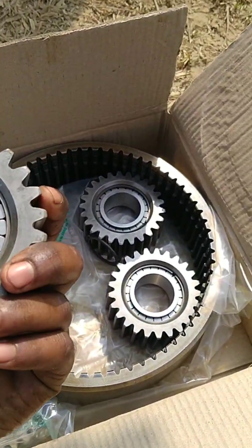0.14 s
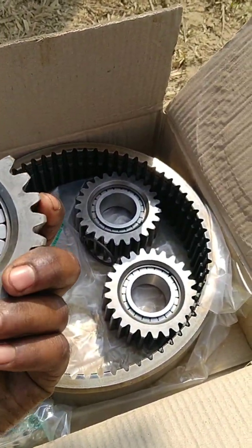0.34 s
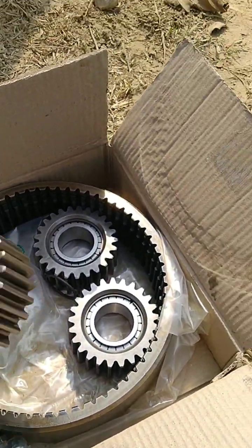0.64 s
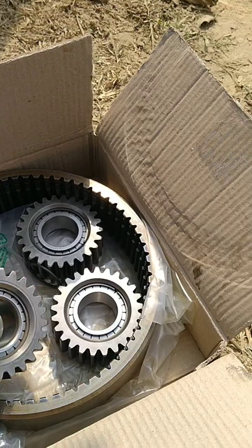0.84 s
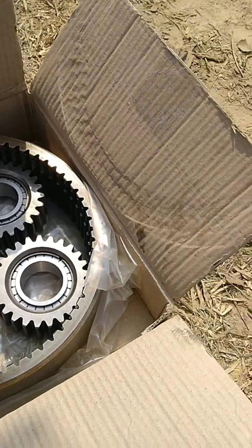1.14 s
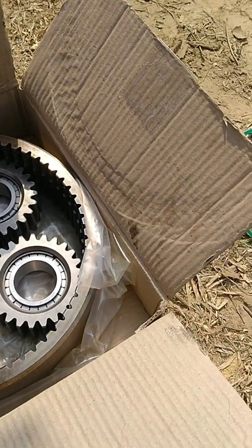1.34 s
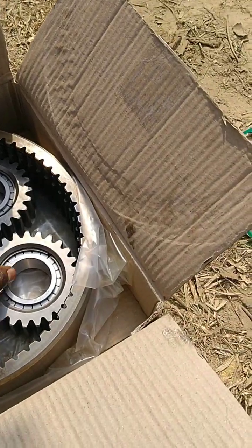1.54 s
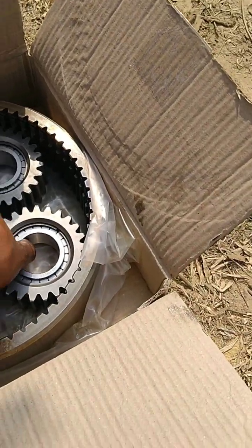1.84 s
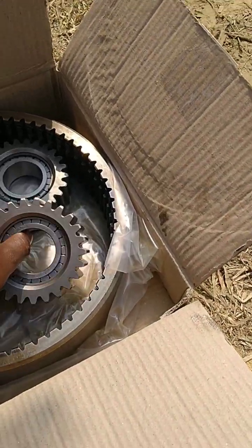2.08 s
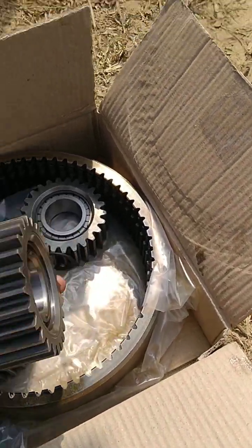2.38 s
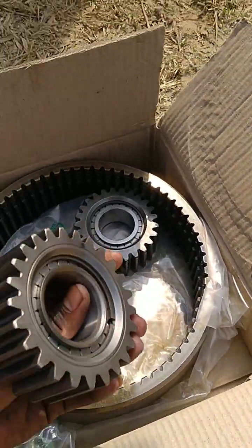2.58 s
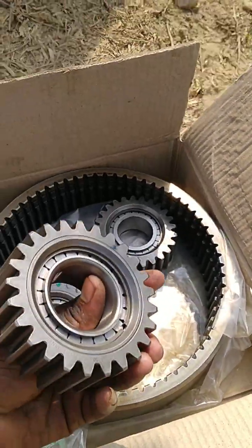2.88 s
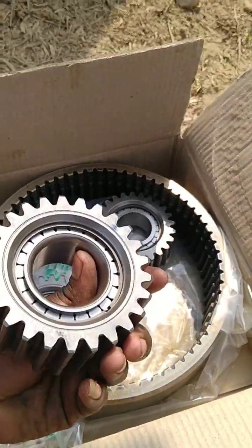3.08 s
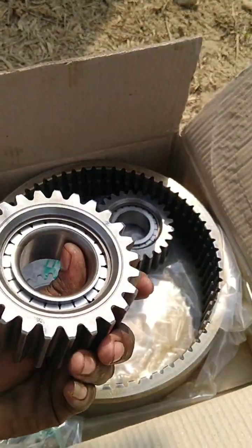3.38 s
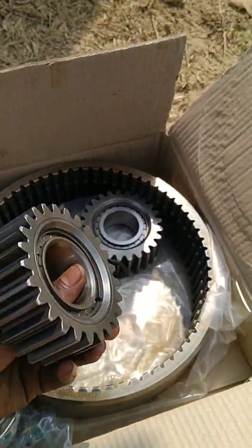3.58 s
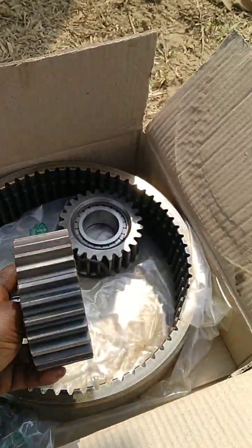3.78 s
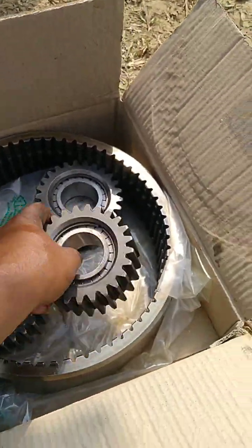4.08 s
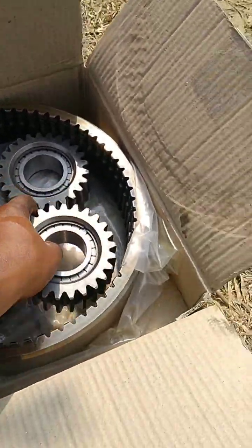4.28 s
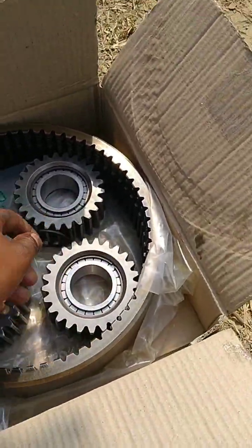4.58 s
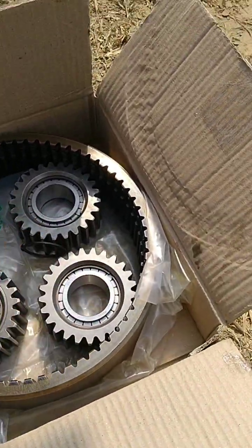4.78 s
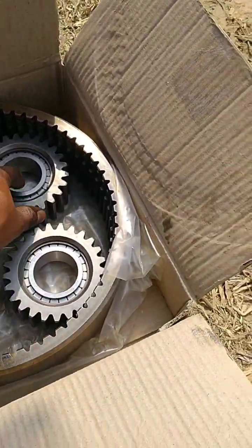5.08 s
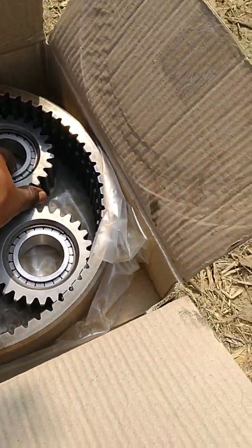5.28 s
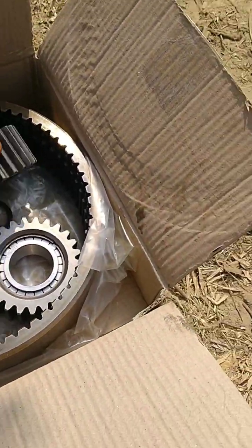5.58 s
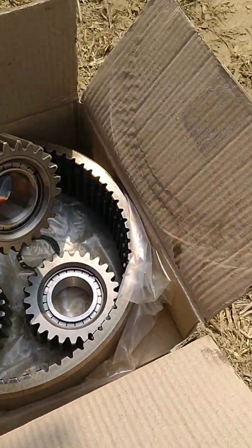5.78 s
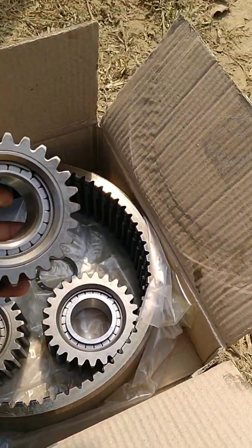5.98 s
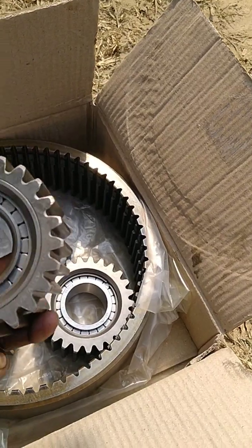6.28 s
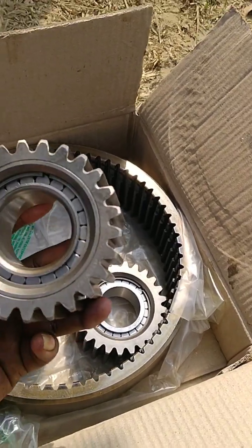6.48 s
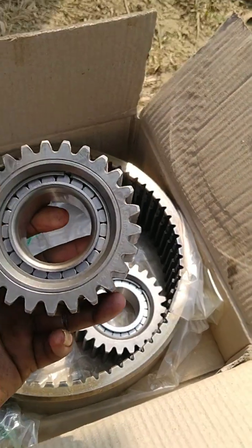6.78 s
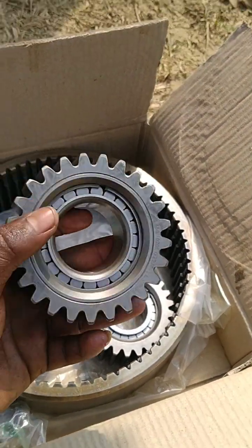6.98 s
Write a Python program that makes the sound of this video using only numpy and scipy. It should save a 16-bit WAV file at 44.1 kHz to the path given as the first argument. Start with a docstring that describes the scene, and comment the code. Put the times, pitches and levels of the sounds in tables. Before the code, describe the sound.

Heavy steel gears clank, scrape and ring briefly as they are handled outdoors, with crackling plastic and rubbing cardboard.

```python
"""Outdoors, in a plastic-lined carton: heavy steel planet gears are set into a ring gear and lifted out.
They knock, ping and ring briefly; their teeth catch, scrape and squeal as they slide out of mesh.
Each move of the hand crackles the plastic sheet and rubs the cardboard.
There are faint gliding squeaks, as of fingers on steel, and a late thin whistle.
Behind it all are light wind and the drone of a far engine."""
import sys
import numpy as np
from scipy import signal
from scipy.fft import rfft, irfft
from scipy.io import wavfile

SR = 44100
rng = np.random.default_rng(int(sys.argv[2]) if len(sys.argv) > 2 else 0)


def bounce(signal):
    """Save signal as a 16-bit WAV file at the path given by the first command-line argument."""
    frames = np.transpose(np.atleast_2d(signal))
    limited = np.clip(frames, -1, 1)
    pcm = np.round(limited * 32767).astype(np.int16)
    wavfile.write(sys.argv[1], SR, pcm)


N = 314874
T = np.arange(N) / SR
RING_T = np.arange(SR) / SR


def amp(db):
    """Decibels to gain."""
    return 10 ** (np.asarray(db) / 20)


def unit(x):
    """Scales to rms 1."""
    return x / np.sqrt(np.mean(x ** 2) + 1e-20)


def add(mix, start_s, sound):
    """Mixes a sound in at start_s."""
    part = mix[max(round(start_s * SR), 0):][:len(sound)]
    part += sound[:len(part)]


def level(rows, column):
    """Gain over time from one dB column of a curve, silent outside it."""
    rows = np.array(rows)
    return amp(np.interp(T, rows[:, 0], rows[:, column], left=-np.inf, right=-np.inf))


def swells(rows):
    """Gain of smooth rises and falls."""
    out = np.zeros(N)
    for start_s, length_s, level_db in rows:
        add(out, start_s, amp(level_db) * np.hanning(round(length_s * SR)))
    return out


def colour(x, spectrum, size=2048):
    """Minimum-phase filter with the given spectrum and power gain 1."""
    hz, db = np.transpose(spectrum)
    log_hz = np.log(abs(np.fft.fftfreq(size, 1 / SR)) + 1)
    log_gain = np.log(amp(np.interp(log_hz, np.log(hz), db)))
    impulse = np.fft.ifft(np.exp(np.conj(signal.hilbert(log_gain)))).real[:size // 2]
    return signal.oaconvolve(x, impulse / np.linalg.norm(impulse))[:len(x)]


def noise(spectrum):
    """Steady noise with the given spectrum, rms 1."""
    hz, db = np.transpose(spectrum)
    gain = amp(np.interp(np.log(np.fft.rfftfreq(N, 1 / SR) + 1), np.log(hz), db))
    return unit(irfft(rfft(rng.standard_normal(N)) * gain, N))


def drift(per_s):
    """Random wander, rms 1."""
    knots_s = np.arange(0, T[-1] + 1, 1 / per_s)
    return unit(np.interp(T, knots_s, rng.standard_normal(len(knots_s))))


def grains(per_s, spread_db):
    """Random impulses of uneven size, rms 1."""
    size = amp(spread_db * np.minimum(rng.exponential(1, N), 4))
    return unit(size * rng.choice([-1, 1], N) * (rng.random(N) < per_s / SR))


def fade(t, t60_s):
    """Exponential decay."""
    return np.exp(-np.log(1000) * t / t60_s)


def burst(t60_s, tail_db, tail_t60_s):
    """A puff of noise and its weak scatter inside the carton."""
    t = RING_T[:SR // 4]
    return rng.standard_normal(len(t)) * (fade(t, t60_s) + amp(tail_db) * fade(t, tail_t60_s))


# outdoor ambience: freq_hz, gain_db
AIR_SPECTRUM = [(12, -45.5), (20, -10.5), (49, -4.5), (74, -11.5), (187, -16.5), (222, -27.5), (293, -10.5),
                (319, -25), (434, -28), (897, -35), (1060, -33.5), (2200, -32.5), (2670, -27.5),
                (5080, -56.5), (16000, -49)]


def air(start_db=-64, fade_db_per_s=0.33):
    """Still air: a low hush, slowly fading."""
    return amp(start_db - fade_db_per_s * T) * noise(AIR_SPECTRUM)


# engine speed: time_s, firing_hz
ENGINE_SPEED = [(0, 48.15), (1.1, 51.64), (2.1, 54.5), (2.5, 59.06), (2.85, 55.5), (3.45, 43.24),
                (4.5, 50.4), (5.5, 49.83), (7.14, 48.3)]
# engine harmonics: order, gain_db
ENGINE_ORDERS = [(1, -1), (2, -0.5), (3, -14), (4, -9)]


def engine(level_db=-63.5, idle_hz=49.7, rev_db_per_hz=0.58, loudest_s=2.5, swell_s=2.1):
    """A far engine: wavering multiples of its firing rate, louder as it revs."""
    firing_hz = np.interp(T, *np.transpose(ENGINE_SPEED))
    phase = 2 * np.pi * np.cumsum(firing_hz * (1 + 0.0083 * drift(per_s=27))) / SR
    gain = amp(level_db + rev_db_per_hz * (firing_hz - idle_hz)) / np.hypot(1, (T - loudest_s) / swell_s)
    return gain * sum(amp(db + 2 * drift(per_s=40)) * np.sin(k * phase) for k, db in ENGINE_ORDERS)


# hand moves: peak_s, rise_s, fall_s, sheet_db, cardboard_db
HAND_MOVES = [(.03, 0.11, 0.08, -74.5, -69), (.66, 0.079, 0.1, -56.5, -74), (1.08, 0.4, 0.28, -67, -67.5),
              (1.3, 0.059, 0.068, -44, -56), (1.8, 0.17, 0.063, -59, -63), (2.07, 0.18, 0.11, -55, -57.5),
              (2.48, .22, 0.18, -55, -55.5), (2.7, 0.037, 0.028, -55, -60), (3.56, .15, 0.15, -75.5, -74),
              (3.99, 0.099, 0.11, -59.5, -69.5), (4.3, 0.14, 0.32, -66.5, -66),
              (4.59, 0.046, 0.094, -48.5, -48.5), (5.06, 0.11, 0.13, -59.5, -61),
              (5.59, 0.099, 0.08, -46, -53), (5.96, 0.12, 0.15, -57.5, -65)]
REST_SHEET_DB, REST_CARDBOARD_DB = -82, -77


def handling(rest_db, column, shape=0.95):
    """Gain of overlapping hand moves: pointed peaks over a hand that never quite stops."""
    power = amp(rest_db) ** 2
    for move in HAND_MOVES:
        peak_s, rise_s, fall_s = move[:3]
        away = np.maximum((peak_s - T) / rise_s, (T - peak_s) / fall_s)
        power = power + amp(move[column]) ** 2 * np.exp(-2 * away ** shape)
    return np.sqrt(power)


# wind rumble: freq_hz, gain_db
WIND_SPECTRUM = [(15, -1), (30, -0.5), (55, -1.5), (90, -8), (180, -24), (400, -47)]
# puffs of air: start_s, length_s, level_db
GUSTS = [(1.88, 0.18, -48.5), (2.6, 0.33, -57), (3.76, 0.31, -59), (4.14, 0.27, -48.5), (5.1, 0.37, -57),
         (5.7, 0.28, -52.5)]


def wind(breeze_db=-66, swing_db=2, stir_db_per_db=0.5, trim_db=-3.5):
    """Light wind and puffs on the microphone; handling stirs the breeze."""
    stir = (handling(REST_CARDBOARD_DB, column=4) / amp(REST_CARDBOARD_DB)) ** stir_db_per_db
    breeze = stir * amp(breeze_db + swing_db * drift(per_s=8))
    return amp(trim_db) * noise(WIND_SPECTRUM) * (breeze + swells(GUSTS))


# two squeaks, then a whistle, one curve each: time_s, pitch_hz, level_db
GLIDES = [
    [(2.76, 5500, -64), (2.79, 6170, -51.5), (2.83, 6140, -55), (2.87, 6600, -64)],
    [(2.97, 5800, -67.5), (3.01, 5520, -69), (3.07, 4265, -70)],
    [(6.58, 6600, -85), (6.64, 7250, -76), (6.75, 7510, -77.5), (6.81, 6950, -80.5), (6.9, 7980, -80.5),
     (6.94, 7400, -76), (7, 6850, -86)],
]


def squeaks_and_whistle(tone_db=-12, fuzz_db=-13):
    """Faint, thin gliding squeaks, as of fingers on steel, and a late thin whistle."""
    out = np.zeros(N)
    for curve in GLIDES:
        time_s, pitch_hz, _ = np.transpose(curve)
        phase = 2 * np.pi * np.cumsum(np.interp(T, time_s, pitch_hz)) / SR
        fuzz = drift(per_s=890) * np.sin(phase) + drift(per_s=350) * np.cos(phase)
        out += level(curve, column=2) * (amp(tone_db) * np.sin(phase) + amp(fuzz_db) * fuzz)
    return out


# cardboard friction: freq_hz, gain_db
RUB_SPECTRUM = [(88, -34), (150, -2), (226, -5), (457, -2), (605, -13), (811, -6), (953, -10), (1090, -4.5),
                (1480, -10), (1980, -10.5), (5000, -23.5), (6500, -51), (11000, -120)]
# carton flexing: start_s, length_s, level_db
THUDS = [(1.93, 0.105, -52), (4.17, 0.17, -49)]
# flex thud: freq_hz, gain_db
THUD_SPECTRUM = [(25, 22), (65, 30.5), (150, 29), (260, 15), (900, -51)]


def carton():
    """Cardboard rubs with each move and flexes under the load."""
    rub_gain = handling(REST_CARDBOARD_DB, column=4) * amp(1.5 + 0.91 * drift(per_s=40))
    return noise(RUB_SPECTRUM) * rub_gain + noise(THUD_SPECTRUM) * swells(THUDS)


# loud crease snaps: start_s, level_db, body_db
SNAPS = [(0.529, -37, -9.5), (1.1272, -36, -1), (1.2536, -19.5, 10.5), (1.297, -12.5, 5), (1.306, -14, 8.5),
         (1.3786, -25, -12), (1.551, -36, -8), (1.6813, -24, -4), (1.7473, -24.5, -0.5), (1.95, -29.5, -1),
         (2.028, -24, -1), (2.0825, -14.5, -15), (2.7135, -30, 0), (2.7356, -36, 2), (3.331, -35.5, -12.5),
         (3.3512, -35.5, 2), (3.394, -40.5, -0.5), (3.4282, -41, -1), (3.5085, -44.5, -1), (3.714, -42, -4),
         (4.556, -32, 14), (4.5772, -13.5, 2), (4.592, -34, 9), (4.7535, -31, -5.5), (4.963, -38.5, -1),
         (5.4034, -36, 12), (5.4794, -27.5, 7), (5.568, -21, 4), (5.5839, -23, 6)]
# one snap: freq_hz, gain_db
SNAP_SPECTRUM = [(300, -11.5), (1000, 2), (2300, 2), (4000, -5.5), (7000, -2), (10000, -4.5), (14000, 3.5),
                 (16000, 1.5)]
# sheet crushed by a gear: start_s, length_s, level_db
CRUSHES = [(1.262, 0.083, -38), (1.672, 0.019, -38.5), (1.702, 0.021, -43.5), (4.558, 0.05, -34.5)]
# sheet rustle: freq_hz, gain_db
RUSTLE_SPECTRUM = [(180, -29.5), (300, -5), (455, -1), (614, -14.5), (1060, -9.5), (1640, -16.5),
                   (2000, -3.5), (3400, -13), (7820, -10.5), (9240, -18.5), (15000, -3.5), (16000, -10.5)]


def plastic(treble_hz=13000, snap_trim_db=-5, crinkles_per_s=20, crinkle_db=-8):
    """Creases snap one by one, crunch under a gear, and hiss and crinkle as the sheet shifts."""
    out = np.zeros(N)
    for start_s, level_db, body_db in SNAPS:
        spectrum = [(hz, db + body_db * np.clip(np.log2(treble_hz / hz), 0, 1))
                    for hz, db in SNAP_SPECTRUM]
        snap = colour(burst(t60_s=0.0091, tail_db=-22, tail_t60_s=0.049), spectrum)
        add(out, start_s + 0.001, amp(level_db + snap_trim_db) * snap)
    crunch = colour(grains(per_s=4600, spread_db=6.5), RUSTLE_SPECTRUM)
    grit = colour(grains(per_s=2300, spread_db=3.5), RUSTLE_SPECTRUM)
    hiss = unit(noise(RUSTLE_SPECTRUM) + 1.4 * grit) * amp(2 + 0.43 * drift(per_s=70))
    crease = burst(t60_s=0.006, tail_db=-23.5, tail_t60_s=0.05)
    creases = signal.oaconvolve(grains(crinkles_per_s, spread_db=2.5), crease)[:N]
    crinkle = amp(crinkle_db) * unit(colour(creases, SNAP_SPECTRUM))
    return out + crunch * swells(CRUSHES) + (hiss + crinkle) * handling(REST_SHEET_DB, column=3)


def bounces(start_s=2.0806, gap_s=0.013, shrink=0.76, first_db=-20, loss_db=4, hz=1760, t60_s=0.012):
    """Tap rows for a tooth bouncing out of mesh, each bounce sooner and weaker."""
    return [(start_s + gap_s * np.sum(shrink ** np.arange(k)), first_db - k * loss_db, hz, t60_s)
            for k in range(4)]


# teeth catching: start_s, level_db, centre_hz, t60_s
TOOTH_TAPS = [(.617, -45, 4000, .015), (.935, -52.5, 901, .031), (1.087, -51.5, 4000, .018),
              (1.68, -41.5, 1900, .042), (1.71, -42.5, 2330, .04), (1.747, -31, 2100, 0.0067),
              (2.03, -39, 1840, .015), (2.912, -52.5, 1904, .08), (3.19, -61.5, 5000, .071),
              (3.349, -47, 3500, .02), (4.156, -49.5, 870, .047), (4.181, -46.5, 950, .036),
              (4.205, -62, 1048, 0.27), (4.4564, -25.5, 4205, .024), (4.896, -52, 2810, .019),
              (5.087, -53, 999, .1), (5.527, -37.5, 4260, .0092), (5.569, -28.5, 2280, .012),
              (5.626, -38, 2200, .041), (5.665, -37.5, 1290, .032), (6.159, -49, 2400, .021)]
# gear landing on the carton floor: start_s, level_db
FLOOR_BUMPS = [(1.257, -32), (1.306, -36), (2.145, -38), (4.572, -36), (5.567, -31.5), (5.608, -47),
               (6.09, -50)]


def taps(bump_hz=368, bump_t60_s=0.05, skirt_db=-17, shoulder_db=-3):
    """Contacts damped at once by hand or carton: one broad, short resonance each."""
    out = np.zeros(N)
    bumps = [(start_s, level_db, bump_hz, bump_t60_s) for start_s, level_db in FLOOR_BUMPS]
    for start_s, level_db, hz, t60_s in TOOTH_TAPS + bumps + bounces():
        hump = [(hz / 10, 2 * skirt_db), (hz / 3, skirt_db), (hz / 1.44, shoulder_db), (hz, 0),
                (hz * 1.55, shoulder_db), (hz * 1.69, skirt_db), (hz * 10, 2 * skirt_db)]
        tap = colour(burst(t60_s, tail_db=-33.5, tail_t60_s=0.16), hump)
        energy = t60_s * SR / (2 * np.log(1000))  # of a decay starting at 1
        add(out, start_s, amp(level_db) * np.sqrt(energy) * tap / np.linalg.norm(tap))
    return out


# squeals and pings of the gear: start_s, rise_s, pitch_hz, level_db, t60_s
SQUEALS_AND_PINGS = [(1.7715, .004, 13545, -43.5, 0.19), (1.7715, .0044, 11500, -45.5, 0.13),
                     (2.081, .0069, 13540, -33.5, 0.29), (2.081, 0.009, 11580, -30.5, .067),
                     (2.114, .016, 11520, -35, 0.083), (2.125, 0.019, 1290, -44, 0.059),
                     (2.158, 0.017, 8780, -44, 0.11), (2.16, 0.041, 14140, -49, 0.096),
                     (3.515, .008, 7600, -59.5, .16), (3.516, .008, 3240, -60.5, 0.062),
                     (5.475, .055, 1176, -29.5, 0.16), (5.5, .011, 11500, -35, .055),
                     (5.68, .0088, 4883, -31.5, 0.071), (5.703, 0.0053, 3610, -35.5, 0.016),
                     (5.724, 0.0019, 3600, -39.5, 0.055), (5.713, 0.04, 8760, -44, 0.11),
                     (5.729, 0.01, 1754, -49, 0.37)]


def squeals_and_pings(waver_hz=9):
    """Squeals and small ringing pings of the gear: one mode grows, then rings out."""
    out, t = np.zeros(N), RING_T
    for start_s, rise_s, pitch_hz, level_db, t60_s in SQUEALS_AND_PINGS:
        envelope = np.minimum(t / rise_s, 1) * fade(np.maximum(t - rise_s, 0), t60_s)
        phase = 2 * np.pi * np.cumsum(pitch_hz + waver_hz * drift(per_s=630)[:len(t)]) / SR
        add(out, start_s, amp(level_db) * envelope * np.sin(phase))
    return out


# modes of a gear held free: pitch_hz, gain_db, t60_s
FREE_GEAR_MODES = [(1297, -5, .27), (1760, -14, .45), (2329, -6, .3), (3605, 1, .18), (4885, -5, .4),
                   (5940, -5, .2), (8760, -3, .35), (11542, -3, .14), (13540, 6, .24), (13640, -4, .15),
                   (14135, -1, .45)]
# tooth friction: freq_hz, gain_db
GRIND_SPECTRUM = [(150, 4), (400, 8), (700, 4), (1200, 12.5), (1700, -10), (2500, 10.5), (4000, -53),
                  (9000, -16), (15000, -17.5)]
# one curve per slide: time_s, ring_db, grind_db
SLIDES = [
    [(1.95, -87, -72), (1.98, -47.5, -45), (2.005, -73, -62), (2.035, -75, -70), (2.055, -50, -81),
     (2.085, -56, -45.5), (2.13, -48, -67), (2.17, -79, -59), (2.21, -75, -71)],
    [(5.41, -91, -59.5), (5.47, -78, -49), (5.51, -36.5, -59), (5.55, -49, -47), (5.6, -41.5, -73),
     (5.67, -43.5, -48.5), (5.71, -53.5, -66), (5.76, -47, -93)],
]


def slides(trim_db=-1):
    """Small slips between teeth grind and keep the lifted gear ringing as the contact chatters."""
    out, t = np.zeros(N), RING_T
    ring = sum(amp(db) / np.sqrt(t60_s) * fade(t, t60_s) * np.sin(2 * np.pi * hz * t)
               for hz, db, t60_s in FREE_GEAR_MODES)
    ring /= np.linalg.norm(ring)
    for curve in SLIDES:
        slips = grains(per_s=9900, spread_db=6.5) * amp(1.6 * drift(per_s=160))
        chatter = amp(3.5 * drift(per_s=150) - 1)
        out += chatter * signal.oaconvolve(slips * level(curve, column=1), ring)[:N]
        out += colour(slips * level(curve, column=2), GRIND_SPECTRUM)
    return amp(trim_db) * out


# mode families of the stacked gears: pitch_hz, gain_db, t60_s
CLUNK_MODES = [(953, -18.5, .33), (345, -23, .074), (396, -17, .13), (1104, -15.5, .06), (1138.5, 2, .096),
               (1123, -12, .046), (1296, -18, .062), (1360, -21.5, .21), (1730, -25.5, .07)]
CLANK_MODES = [(2160, -12.5, .06), (2133, -10.5, 0.065), (2157, 0, 0.13), (2143, -22.5, 0.28),
               (2250, -17.5, 0.28), (2890, -30.5, 0.12)]
RIM_MODES = [(2607, 0, .12), (2612, -27, .3), (2800, -21, .06), (4365, -15, .12), (4980, -24, .15),
             (5963, -31, .45), (6122, -21, .13), (6342, -23, .09), (7946, -28, .11), (8403, -35, .2),
             (9878, -41, .14)]
CHIME_MODES = [(3446, 0, .21), (4365, -21, .14), (4982, -26, .28), (5963, -26, .5), (6738, -18, .18),
               (8703, -25, .24), (10850, -28, .12), (13230, -34, .25), (15600, -25, .22)]
# dry contact clack: freq_hz, gain_db
CLACK_SPECTRUM = [(100, -16.5), (250, -11.5), (400, 4.5), (650, -10.5), (1150, 11.5), (1600, -4),
                  (2300, -3.5), (3300, -20.5), (6000, -30), (15000, -41)]
# gear on gear: start_s, swell_s, seat_s, clunk_db, clank_db, rim_db, chime_db, clack_db
KNOCKS = [(1.1734, .003, 0.026, -17, -27.5, -57.5, -36, -23),
          (1.183, .0024, 0.013, -21, -41, -57.5, -53, -37.5),
          (1.196, .004, 0.075, -41, -24, -62, -53.5, -40.5),
          (1.256, .0024, 0.011, -50.5, -46, -53.5, -61, -38), (1.266, .007, .02, -49, -29.5, -66, -71, -47),
          (1.284, .011, 0.01, -17, -18.5, -57.5, -54, -37),
          (1.3038, .0028, 0.057, -18, -10, -33.5, -20.5, -26.5),
          (1.3214, .0024, 0.02, -30, -22.5, -49.5, -42.5, -34),
          (1.9456, .003, .03, -39, -30.5, -50, -72, -34),
          (4.4271, .0024, .03, -30, -17.5, -39, -41.5, -24.5),
          (4.435, .0024, 0.012, -32, -27.5, -28, -49, -31),
          (4.4538, .0024, 0.054, -21, -16.5, -11.5, -28, -24),
          (4.566, .003, 0.017, -50, -31.5, -42, -57, -39), (4.5838, .0024, .02, -29, -35, -37.5, -41, -34),
          (4.6635, .002, 0.014, -31.5, -46.5, -66, -78, -36.5),
          (5.4806, .004, 0.0066, -46, -71, -70, -73, -36.5),
          (5.511, .0024, .0043, -29, -54, -70, -53, -33.5)]


def knocks(choke_t60_s=0.05, lasting_t60_s=0.145):
    """Steel on steel: modes swell as the faces chatter; the short ones choke once the faces seat."""
    out = np.zeros(N)
    families = (CLUNK_MODES, CLANK_MODES, RIM_MODES, CHIME_MODES)
    for start_s, swell_s, seat_s, *family_db, clack_db in KNOCKS:
        for blow_db, modes in zip(family_db, families):  # where a blow lands sets each share
            for pitch_hz, gain_db, t60_s in modes:
                t = RING_T[:round(1.2 * t60_s * SR)]
                envelope = (1 - np.exp(-t / swell_s)) * fade(t, t60_s)
                if t60_s <= lasting_t60_s:
                    envelope *= fade(np.maximum(t - seat_s, 0), choke_t60_s)
                add(out, start_s, amp(blow_db + gain_db) * envelope * np.sin(2 * np.pi * pitch_hz * t))
        clack = colour(burst(t60_s=0.053, tail_db=-22, tail_t60_s=0.54), CLACK_SPECTRUM)
        add(out, start_s, amp(clack_db) * clack)
    return out


def scene():
    """Mono mix, heard from above the carton."""
    outdoors = air() + engine() + wind()
    packing = carton() + plastic()
    gears = taps() + squeals_and_pings() + slides() + knocks()
    return (outdoors + squeaks_and_whistle() + packing + gears)[None]


def record(dry, cutoff_hz=16100):
    """Steep low-pass."""
    low_pass = signal.firwin(255, cutoff_hz, window=("kaiser", 8), fs=SR)
    return signal.oaconvolve(dry, low_pass[None], "same")


dry = scene()
out = record(dry)
bounce(out)
```